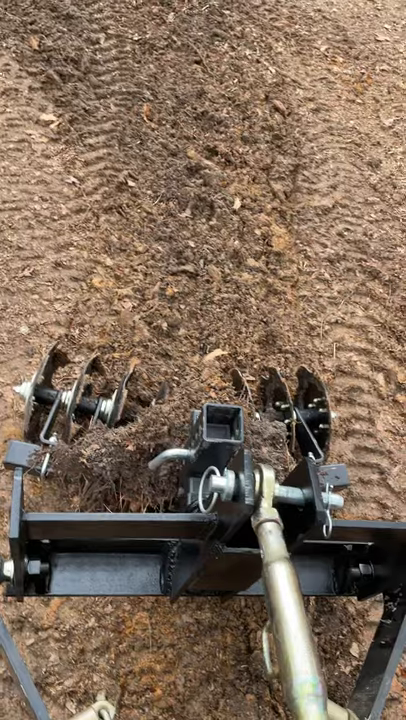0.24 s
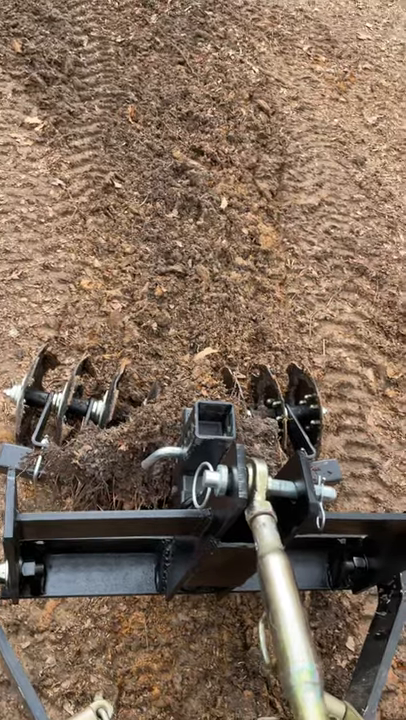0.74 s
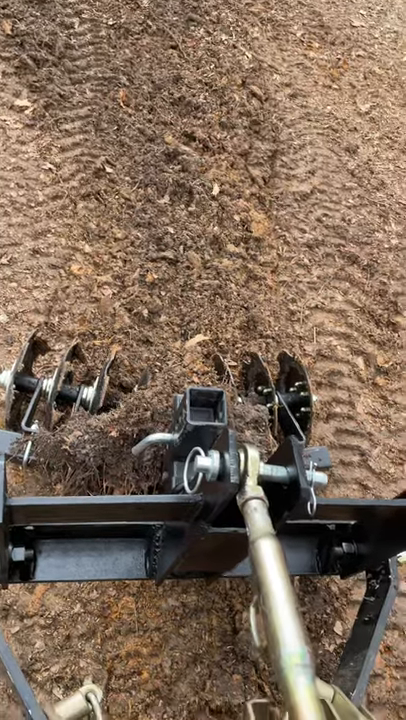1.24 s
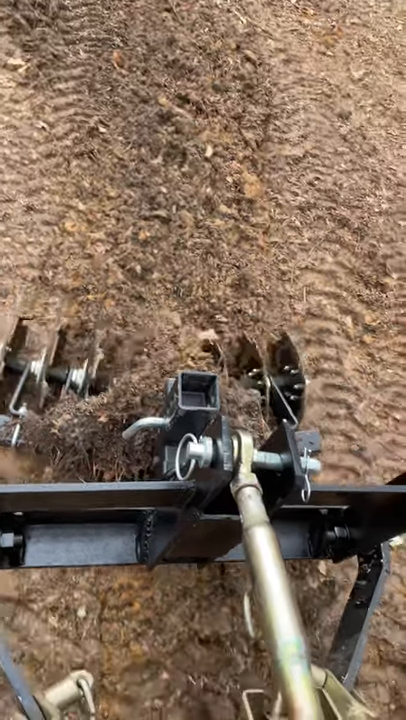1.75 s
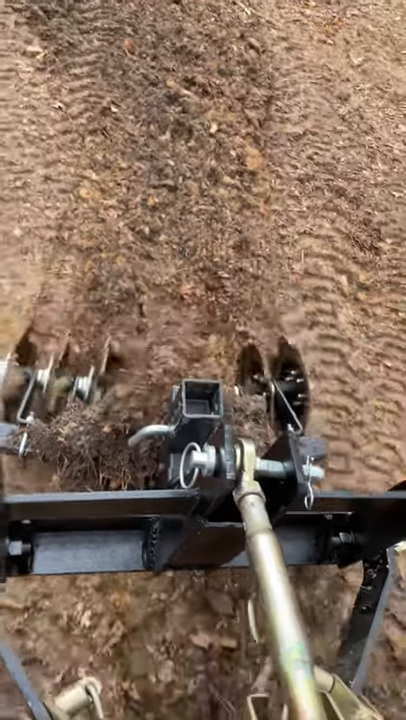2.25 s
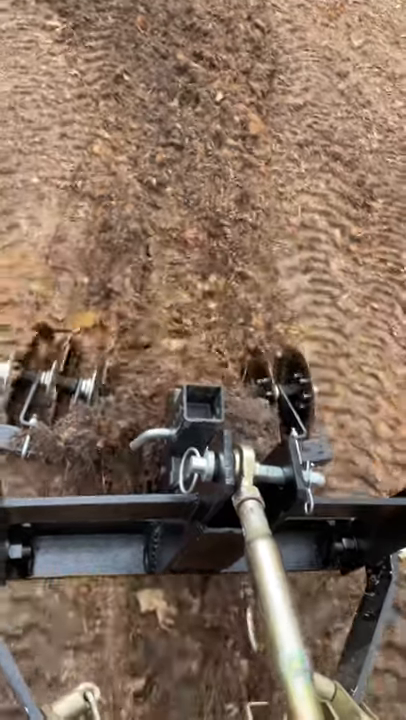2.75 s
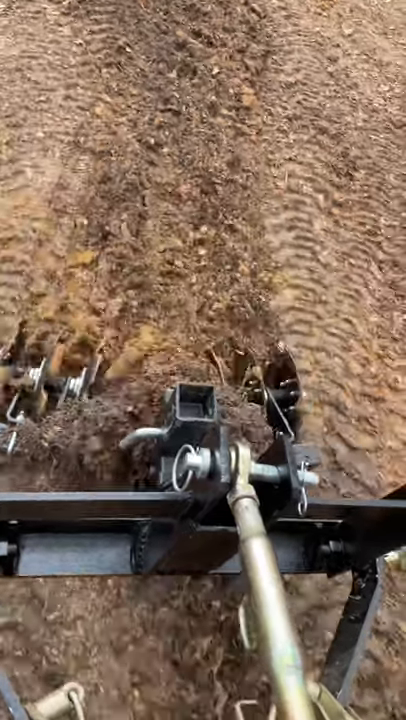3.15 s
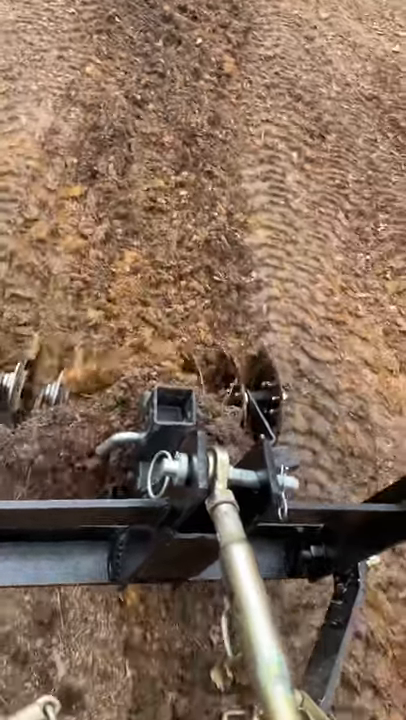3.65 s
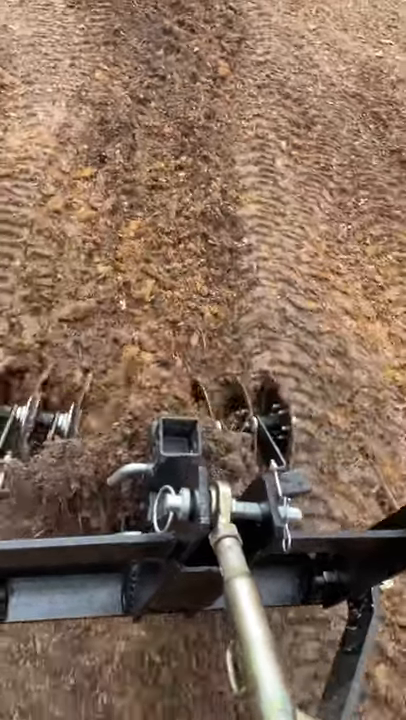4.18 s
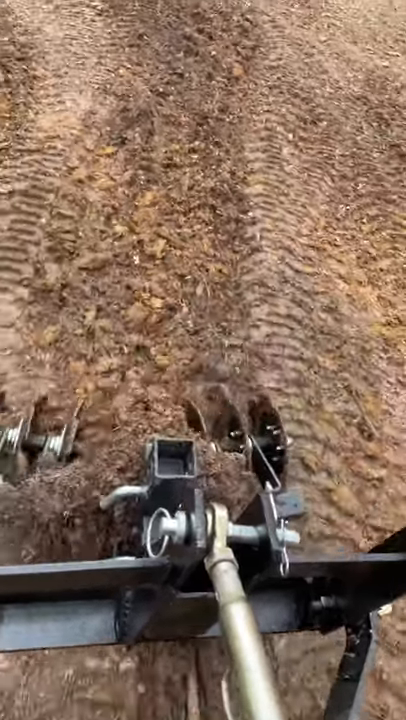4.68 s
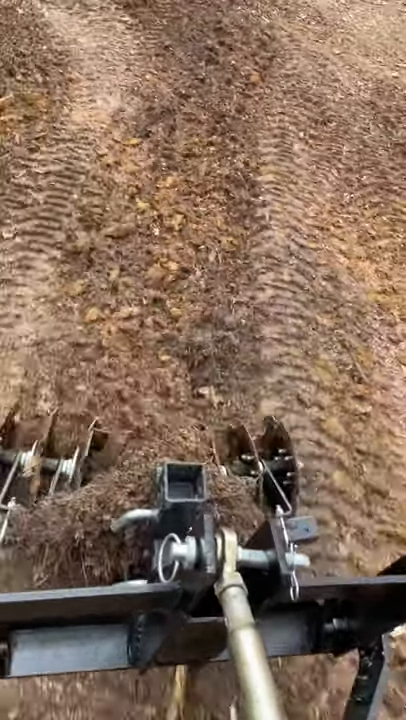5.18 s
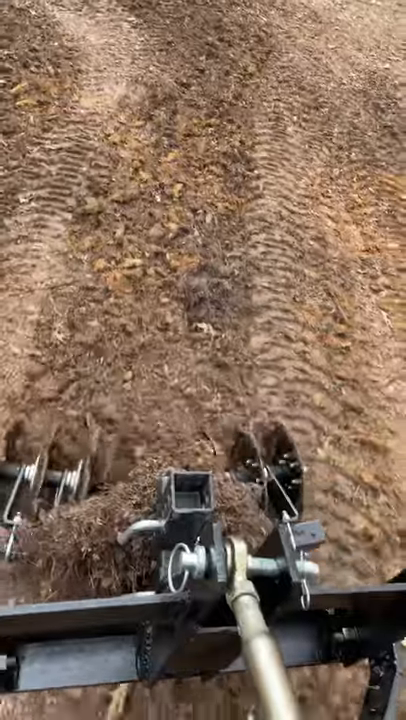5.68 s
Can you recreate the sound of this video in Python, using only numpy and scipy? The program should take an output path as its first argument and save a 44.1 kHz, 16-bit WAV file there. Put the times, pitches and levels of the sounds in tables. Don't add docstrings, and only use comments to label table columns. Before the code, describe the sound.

Close on a compact three-cylinder diesel tractor outdoors in a dry field. It runs at a steady fast idle with valve clatter and a gear-pump whine. At about one second the drive engages, a hydraulic pump begins to sing, and from about 1.6 seconds stones crunch and ping irregularly on the harrow discs. A handheld phone above the hitch hears it loud, dry and slightly saturated.

```python
import sys
import numpy as np
from scipy import signal
from scipy.fft import rfft, irfft
from scipy.io import wavfile
from scipy.ndimage import uniform_filter1d

SR = 44100
rng = np.random.default_rng(int(sys.argv[2]) if len(sys.argv) > 2 else 0)


def decibels_to_gain(level_db):
    exponent = np.asarray(level_db, float) / 20
    return 10 ** exponent


def to_wav(sig):
    pcm = np.clip(np.atleast_2d(sig), -1, 1) * 32767
    pcm = np.round(pcm).astype(np.int16)
    wavfile.write(sys.argv[1], SR, pcm.T)


N = 261072
T = np.arange(0, N + 64, 64) / SR
HZ = np.maximum(np.fft.rfftfreq(N, 1 / SR), 1)
DRIVE_S, TAKE_UP_S = 0.996, 0.14


def fine(control):
    return np.interp(np.arange(N) / SR, T, control)


def curves(table):
    s, *columns = np.transpose(table)
    return [np.interp(T, s, column) for column in columns]


def ramp(start_s, length_s):
    return np.clip((T - start_s) / length_s, 0, 1)


def walk(rate):
    hold = int(1 / (rate * T[1]))
    levels = np.repeat(rng.standard_normal(len(T) // hold + 1), hold)
    smooth = uniform_filter1d(uniform_filter1d(levels, hold), hold)
    return 1.442 * smooth[:len(T)]


def ring(hz, width):
    return 1 / (1 + 1j * (HZ / hz - hz / HZ) * hz / (1.152 * width)) ** 2


def tone(angle, db, share, lead, flutter_db, rate=9):
    waver = 2 * np.pi * rng.random() + .07 * flutter_db * walk(rate)
    strength = fine(decibels_to_gain(db + flutter_db * walk(rate)))
    phasor = np.sqrt(2) * strength * np.exp(1j * (angle + fine(waver)))
    return np.array([phasor.real, (share * np.exp(1j * lead) * phasor).real])


# t/s, four-stroke cycle f/Hz, lean of the phone from pipe toward muffler shell level/dB
ENGINE_RUN = [(0, 20.41, -0.5), (.3, 20.45, -1.5), (.6, 20.41, -0.5), (.9, 20.42, -1), (1.3, 20.39, -0.5),
              (1.63, 20.17, 1), (1.93, 20.34, .5), (2.25, 20.2, 1), (2.7, 20.2, 1), (3.2, 20.32, 1),
              (3.42, 20.28, -1.5), (3.87, 20.11, -0.3), (4.3, 20.09, -0.13), (4.58, 20.29, 1),
              (4.76, 20.11, 0.84), (5.03, 20.4, 0.5), (5.3, 20.13, 3), (5.8, 20.25, 0.5)]


def engine_run():
    hz, lean_db = curves(ENGINE_RUN)
    return 2 * np.pi * np.cumsum(fine(hz)) / SR, lean_db


# f/cycle rate, level/dB, side share
ENGINE_ORDERS = [(2.025, -45, 0.29), (4, -47.5, 0.133), (7.05, -41.5, 0), (9.002, -35.5, 0.015),
                 (10.89, -38, 0), (11.988, -30.5, .04), (13.508, -32.5, .04), (13.845, -46, 0.00081),
                 (15.28, -27, 0.107), (16.566, -50, .1), (18.33, -40.5, .1), (19.955, -34, 0.01),
                 (21.094, -38, .1), (21.815, -42, .06), (22.52, -31, .06), (23.624, -43.5, .1),
                 (23.5, -49, .1), (26.505, -42.5, .17), (27.3, -52.5, .2), (29.74, -41, .2),
                 (58.29, -45, .05), (260.43, -52.5, .6), (284.2, -52.5, .6)]


def exhaust(crank, lean_db):
    firing_db = -14.5 - 0.23 * T - .3 * lean_db + 0.37 * walk(5)
    octave_db = -17.5 + lean_db
    firing = fine(decibels_to_gain(firing_db + 0.086 * walk(14))) * np.cos(3 * crank)
    octave = fine(decibels_to_gain(octave_db + 0.22 * walk(17))) * np.cos(6 * crank + 2.55)
    rest = sum(tone(order * crank, db, share, 2.6, flutter_db=1.5, rate=4.142)
               for order, db, share in ENGINE_ORDERS)
    return np.sqrt(2) * np.array([firing + octave, .004 * octave]) + rest


def clatter(crank, count=15):
    angle, usual = rng.random(count), decibels_to_gain(4.81 * rng.standard_normal(count))
    angle[0], usual[0] = .74, decibels_to_gain(10.0)
    turns = crank / (2 * np.pi)
    cycle = np.arange(int(turns[-1]) + 1)[:, None]
    at = np.interp(cycle + angle, turns, np.arange(N)).astype(int)
    strength = usual * decibels_to_gain(4.46 * rng.standard_normal(at.shape))
    knocks = np.zeros(N)
    np.add.at(knocks, at.ravel(), strength.ravel())
    return knocks


def load_swells(load, turn, strain):
    idle = 1 - load
    boom = 5 * (1 - ramp(DRIVE_S + TAKE_UP_S, .6)) + 0.98 * walk(6)
    drive = -3.5 * idle + 0.28 * strain + 0.42 * walk(11)
    casing = -2 * idle + 0.33 * strain - turn + 1.2 * walk(3.5)
    soil = -3 * idle + turn + 1.5 * walk(4.4)
    octaves = [0.23 * boom, 0.785 * boom, 0.15 * drive, 0.16 * drive, 0.22 * drive,
               1.515 * casing, 0.7 * soil, 0.98 * soil]
    flickers_db = [.3, .3, 0.24, 0.4, 0.2, 1.63, 1.29, 2.8]
    halves = [db + flicker * walk(34) for db, flicker in zip(octaves, flickers_db) for half in range(2)]
    return halves[1:]


def coloured(spectrum, swells):
    place = np.clip(2 * np.log2(HZ / 125), 0, len(swells) - 1)
    out = 0
    for k, db in enumerate(swells):
        band = np.clip(1 - abs(place - k), 0, 1)
        out = out + fine(decibels_to_gain(db)) * irfft(spectrum * band, N)
    return out


def density(points):
    f, db = np.transpose(points)
    return decibels_to_gain(2 * np.interp(np.log(HZ), np.log(f), db))


# f/Hz, level/dB per Hz
ROAR_MID = [(30, -64), (90, -54), (170, -55.5), (340, -53.5), (600, -53.5), (850, -57), (1350, -60),
            (1750, -61), (2650, -62), (3500, -70.5), (5000, -74.5), (6500, -78), (8800, -94.5),
            (10000, -120)]
# f/Hz, level/dB per Hz
ROAR_DIFFERENCE = [(30, -95), (90, -82.5), (200, -87), (280, -69), (500, -67.5), (850, -62.5),
                   (1300, -66.5), (1950, -69.5), (2550, -66.5), (3400, -70), (4200, -79), (6200, -78),
                   (11000, -87), (13000, -95)]
# f/Hz, width/Hz, noise level/dB per Hz, side minus mid level/dB, clatter level/dB
PANELS = [(250.1, 66, -42.5, -30.5, -33), (423.9, 36.9, -54, -20, -27), (1141.7, 79, -60, -3.5, -35),
          (2241.2, 162, -59, -12, -36.5), (3131, 170, -68.5, 1, -44.5), (3650, 120, -77, -0.5, -52.5),
          (5390, 60, -66.5, -1.5, -63), (5718, 210, -68.5, -5, -55.5), (6168, 99, -74, -7.5, -55),
          (15300, 800, -99, 6.5, -100)]


def body(knocks, swells):
    mid_power, side_power, knock_response = density(ROAR_MID), density(ROAR_DIFFERENCE), 0
    for hz, width, noise_db, side_db, knock_db in PANELS:
        mode = ring(hz, width)
        mid_power = mid_power + decibels_to_gain(2 * noise_db) * abs(mode) ** 2
        side_power = side_power + decibels_to_gain(2 * (noise_db + side_db)) * abs(mode) ** 2
        ports = np.array([[1], [1j * decibels_to_gain(side_db)]])
        knock_response = knock_response + decibels_to_gain(knock_db) * np.sqrt(SR / 2 / width) * mode * ports
    common, own = rfft(rng.standard_normal((2, N))) * np.sqrt(SR / 2)
    tied = np.clip(HZ / 4200., 0, .7)
    side_noise = 1j * tied * common + np.sqrt(1 - tied ** 2) * own
    noise = np.array([np.sqrt(mid_power) * common, np.sqrt(side_power) * side_noise])
    return coloured(noise, swells) + irfft(knock_response * rfft(knocks / knocks.std()), N)


# harmonic, level/dB to the first, side share, side lead/rad
GEAR_PUMP = [(1, -0.5, 0.25, -.7), (2, -14, .3, 1.4), (3, -20.5, .4, .5), (4, -26, .4, 1.1)]


def gear_pump(crank, load):
    gear_db = -27.5 - load - 1.14 * load * (T - DRIVE_S)
    return sum(tone(52 * k * crank, gear_db + db, share, lead, flutter_db=0.92, rate=14)
               for k, db, share, lead in GEAR_PUMP)


def bypass_whine(crank):
    whine_db = -42.5 - 14.5 * ramp(1.25, .08)
    return tone(260 * crank, whine_db, .45, 2.0, flutter_db=-0.27, rate=8)


def bearings(crank):
    early = tone(178.3 * crank, -49.5 - 6 * ramp(1.7, .3), .5, 2.6, flutter_db=1.5)
    late_db = -50 + 8 * ramp(4.7, 0.24) - 6 * ramp(4.7, .3)
    return early + tone(155.0 * crank, late_db, .4, 2.6, flutter_db=3.0)


# t/s, piston pump level/dB
OIL_PRESSURE = [(0, -56), (1.05, -49), (1.18, -38.5), (1.3, -34), (1.63, -28), (1.85, -31), (2.07, -31.5),
                (2.25, -33), (2.6, -32.5), (3.5, -30.5), (4.0, -32), (4.15, -34.5), (4.55, -32.5),
                (4.8, -36.5), (5.03, -33.5), (5.4, -34), (5.58, -35.5), (5.75, -30)]
# harmonic, level/dB to the oil pressure, side share, side lead/rad
PISTON_PUMP = [(2, -6, .15, -10), (3, -4.5, .5, -4), (4, -0.5, .33, 1.78), (5, 0.5, .22, -0.5),
               (6, -10, .4, 4), (7, -31.5, .4, -0.5), (8, -10.5, .6, 4), (10, -28, .45, 0)]


def oil_pressure():
    return curves(OIL_PRESSURE)[0]


def piston_pump(crank, pressure_db, turn):
    out = 0
    for k, db, share, lead in PISTON_PUMP:
        level_db = pressure_db + db - 2 * (k < 5) * turn
        out = out + tone(18 * k * crank, level_db, share, lead, flutter_db=1.27, rate=14)
        out = out + tone(17.84 * k * crank, level_db - 14, share, lead, flutter_db=3.0)
    return out


# t/s, crunch level/dB, disc ring f/Hz, ring level/dB
STONE_HITS = [(1.659, -43.5, 3162, -29), (1.719, -36.5, 4473, -36), (1.996, -35.5, 4810, -38.5),
              (2.0126, -42.5, 5000, -48), (2.184, -45.5, 5040, -35), (2.544, -42.5, 4077, -38),
              (2.627, -40.5, 4363, -48), (3.249, -36, 5630, -42), (3.291, -40.5, 5530, -35),
              (3.456, -48, 6170, -42), (3.55, -41, 4630, -38), (3.58, -45, 2918, -29.5),
              (3.779, -35, 4052, -38), (3.905, -32.5, 4956, -50.5), (4.108, -48.5, 3025, -33.5),
              (4.358, -43.5, 5028, -32.5), (4.39, -41, 5305, -36), (4.413, -37, 4117, -34),
              (4.449, -39.5, 6340, -47.5), (4.935, -37, 5135, -38.5), (5.13, -33, 3830, -39),
              (5.483, -29, 4847, -33), (5.528, -44.5, 3778, -32.5), (5.659, -33.5, 5290, -37.5),
              (5.696, -48, 4088, -34), (5.872, -36, 6810, -42), (5.908, -30, 6920, -44.5)]


def stones():
    strike, steel, t = np.zeros(N), np.zeros(N + 2000), np.arange(2000) / SR
    for s, db, hz, ring_db in STONE_HITS:
        at = int(s * SR)
        strike[at] = decibels_to_gain(db)
        scuff = .28 * rng.standard_normal(2000)
        vibration = np.exp(-t / .006) * np.sin(2 * np.pi * hz * t + scuff.cumsum())
        steel[at:at + 2000] += decibels_to_gain(ring_db + 8.0) * vibration
    pebbles, from_s = 70, 1.5
    when, size = rng.random((pebbles, 2)).T
    at = (from_s * SR + when * (N - 1 - from_s * SR)).astype(int)
    strike[at] += decibels_to_gain(-49 - 1.2 * np.log(size))
    fade = np.exp(-t / .015) * np.minimum(t / .004, 1)
    cracks_db = 2.5 * rng.exponential(size=N) * (rng.random(N) < .1)
    grit = decibels_to_gain(cracks_db) * rng.standard_normal((2, N))
    mid, side = rfft(signal.fftconvolve(strike, fade)[:N] * grit)
    mid = mid * (decibels_to_gain(10.5) * ring(4600., 2800.0) + decibels_to_gain(-3.5) * ring(15000., 1200.))
    side = side * decibels_to_gain(7.5) * ring(7500., 6500.)
    return irfft(np.array([mid, side]), N) + steel[:N] * np.array([[1], [.4]])


def scene():
    crank, lean_db = engine_run()
    pressure_db = oil_pressure()
    load = ramp(DRIVE_S, TAKE_UP_S)
    turn_s, turn_in_s, hold_s = 4.128, 0.77, 0.549
    turn = ramp(turn_s, turn_in_s) - ramp(turn_s + turn_in_s + hold_s, 0.44)
    strain = load * (pressure_db + 32)
    out = exhaust(crank, lean_db)
    out = out + body(clatter(crank), load_swells(load, turn, strain))
    out = out + gear_pump(crank, load) + bypass_whine(crank) + bearings(crank)
    out = out + piston_pump(crank, pressure_db, turn)
    mid, side = out + stones()
    return np.array([mid + side, mid - side])


def top_cut(x):
    return signal.sosfilt(signal.butter(12, 17010, fs=SR, output="sos"), x)


def record(dry):
    left, right = np.tanh(0.4456 * dry) / 0.4547
    centre_band = (HZ < 9600) | (abs(HZ - 15100) < 700)
    mid = irfft(rfft(left + right) * centre_band, N) / 2 - .0026
    side = irfft(rfft(left - right) * (HZ < 15800), N) / 2 - .005 * mid
    return top_cut(np.array([mid + side, mid - side]))


dry = scene()
out = record(dry)
to_wav(out)
```